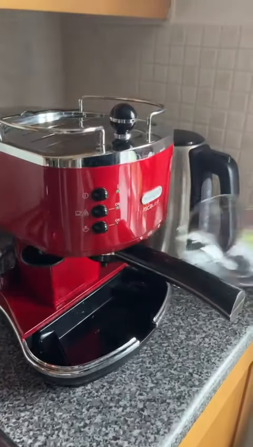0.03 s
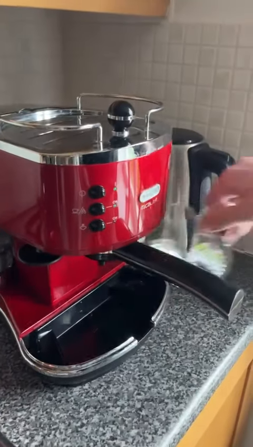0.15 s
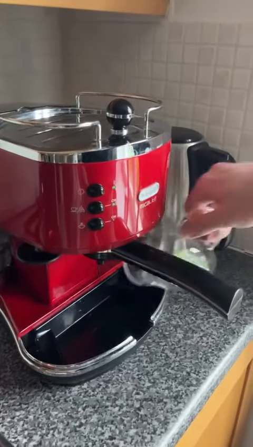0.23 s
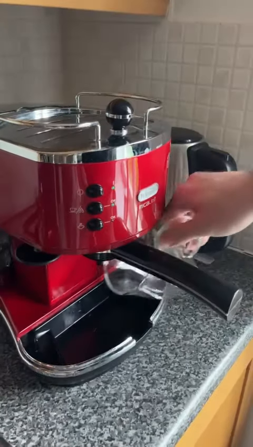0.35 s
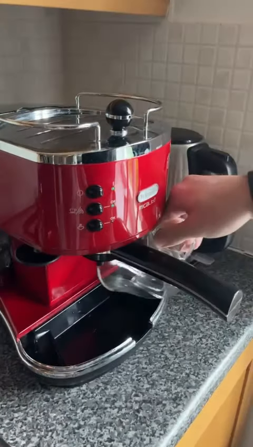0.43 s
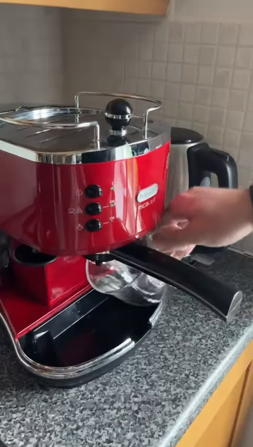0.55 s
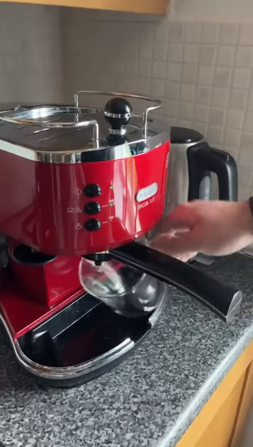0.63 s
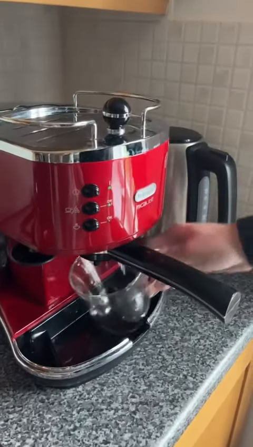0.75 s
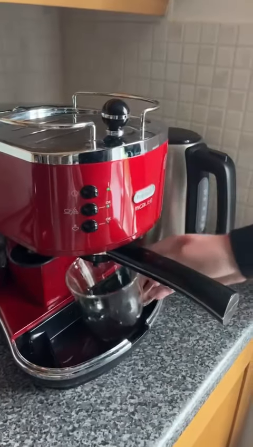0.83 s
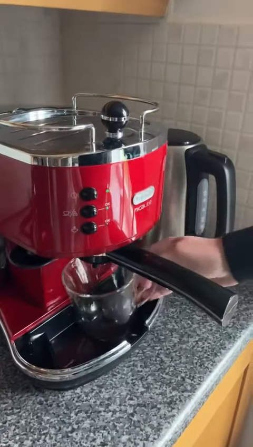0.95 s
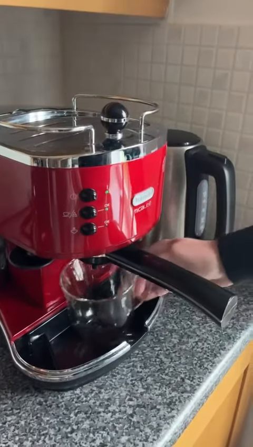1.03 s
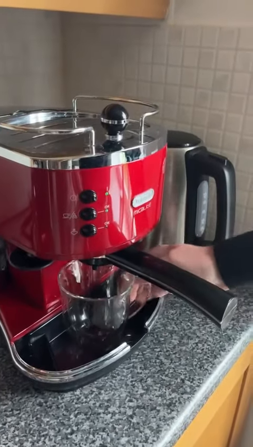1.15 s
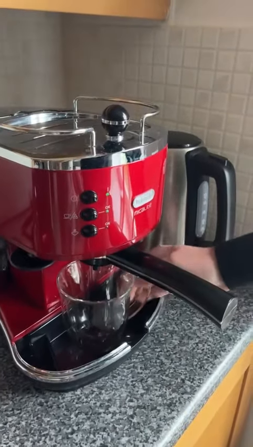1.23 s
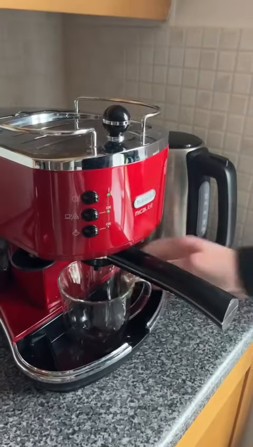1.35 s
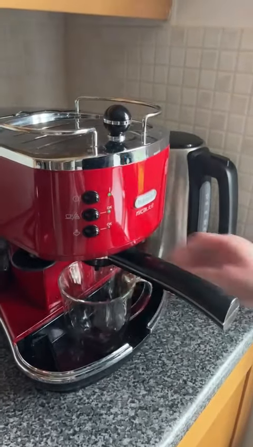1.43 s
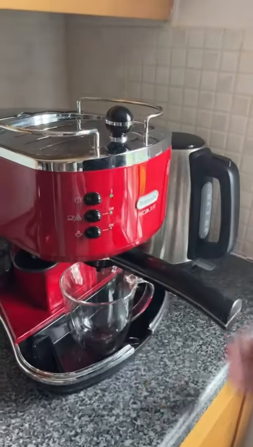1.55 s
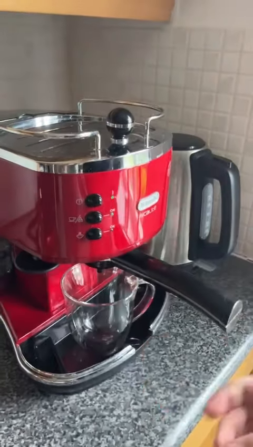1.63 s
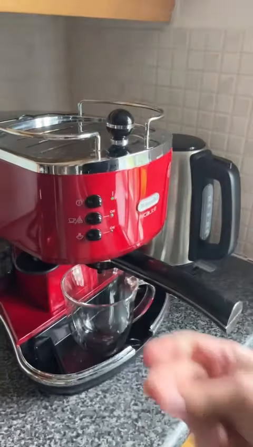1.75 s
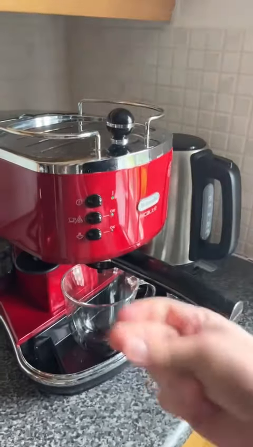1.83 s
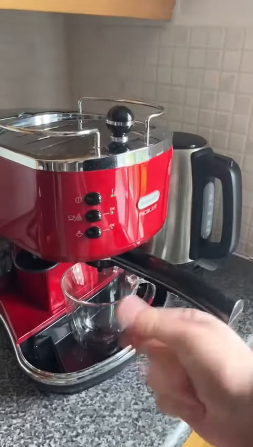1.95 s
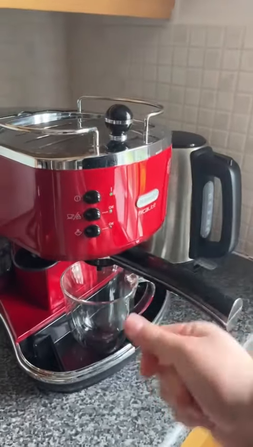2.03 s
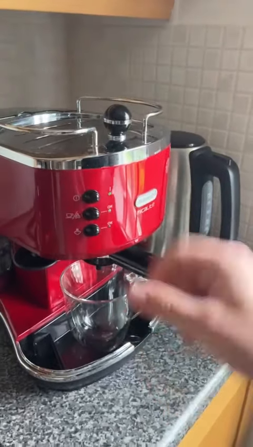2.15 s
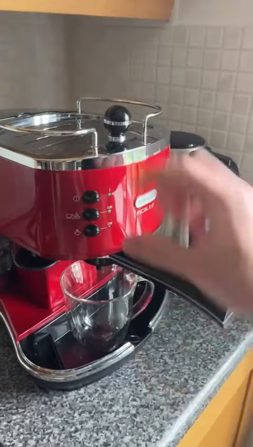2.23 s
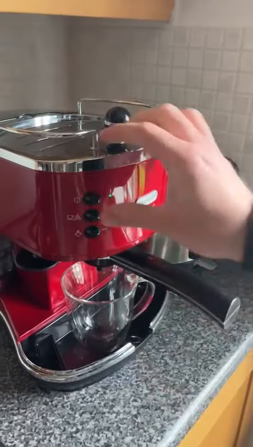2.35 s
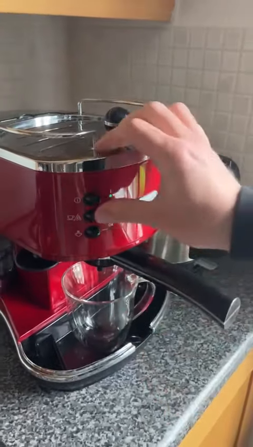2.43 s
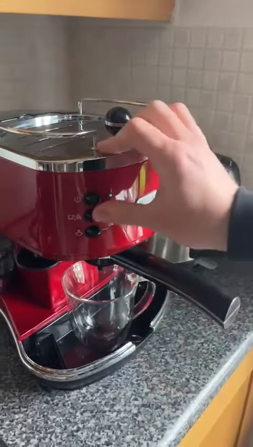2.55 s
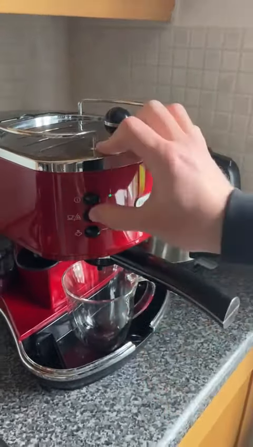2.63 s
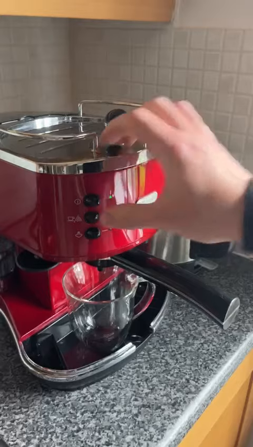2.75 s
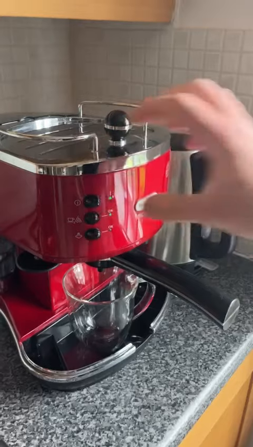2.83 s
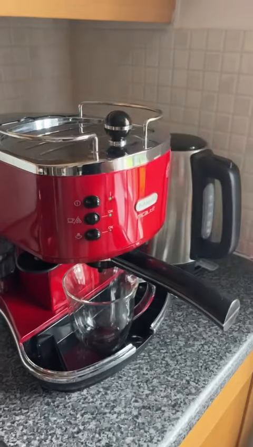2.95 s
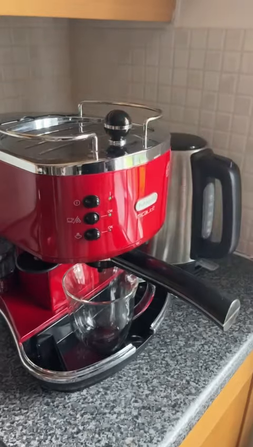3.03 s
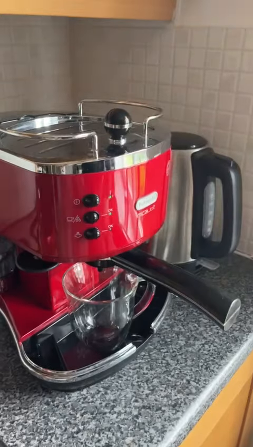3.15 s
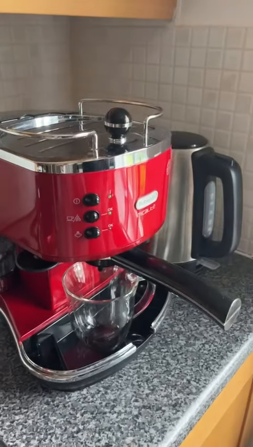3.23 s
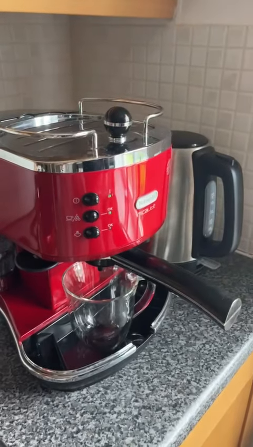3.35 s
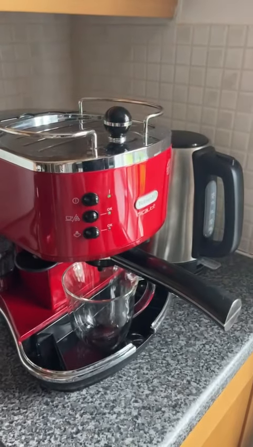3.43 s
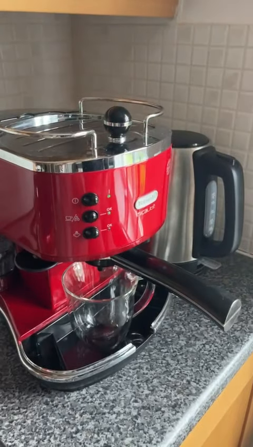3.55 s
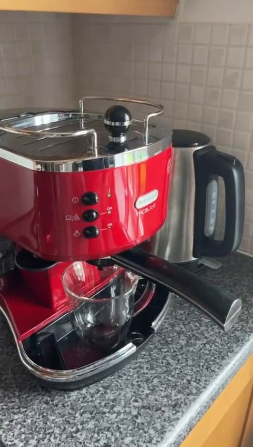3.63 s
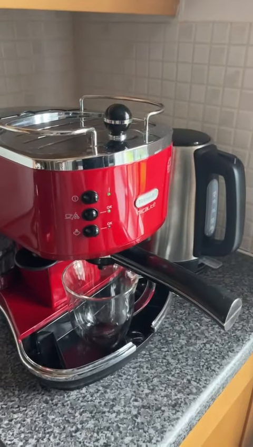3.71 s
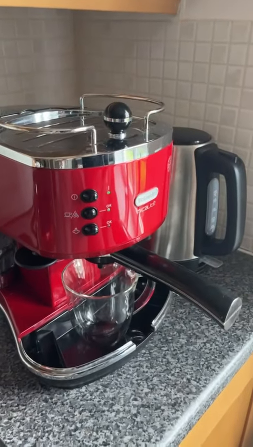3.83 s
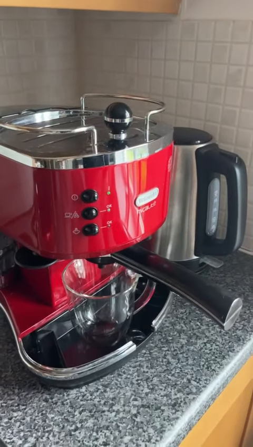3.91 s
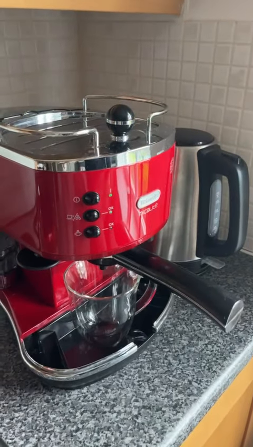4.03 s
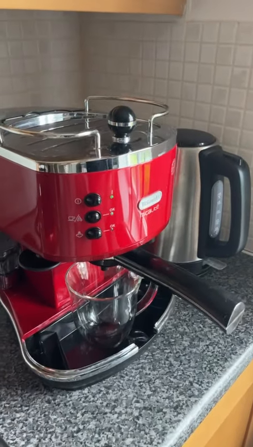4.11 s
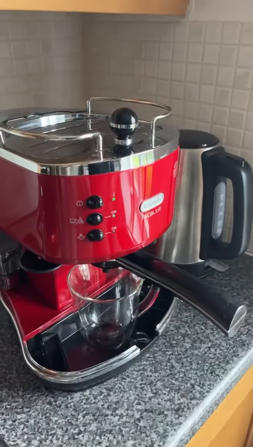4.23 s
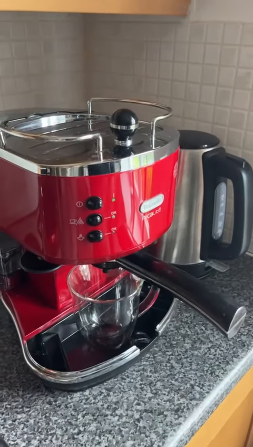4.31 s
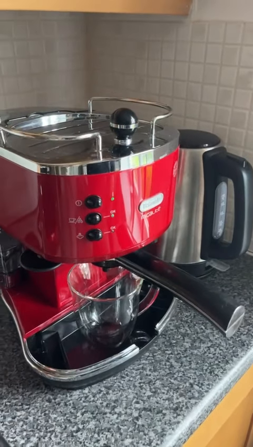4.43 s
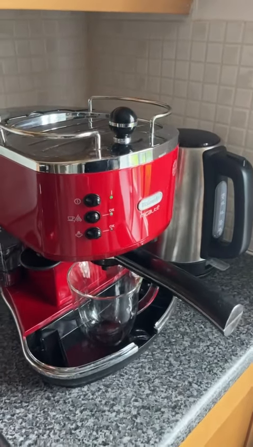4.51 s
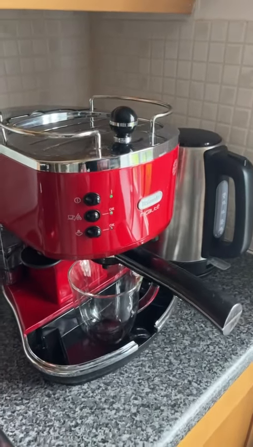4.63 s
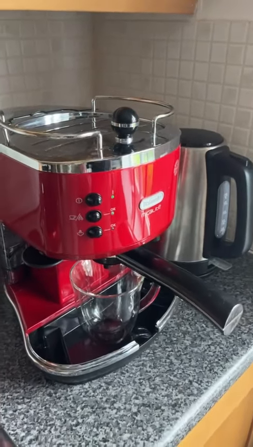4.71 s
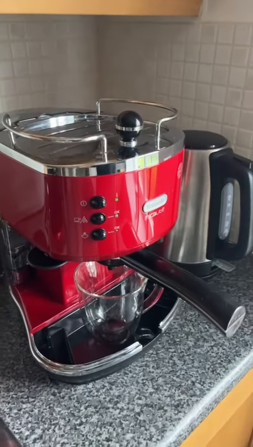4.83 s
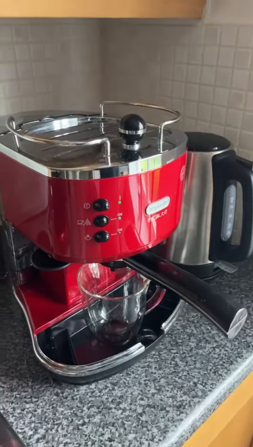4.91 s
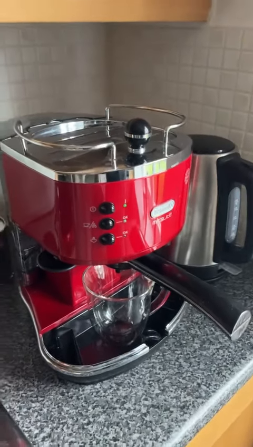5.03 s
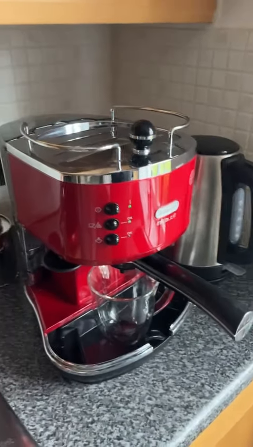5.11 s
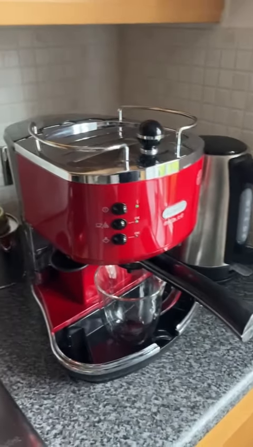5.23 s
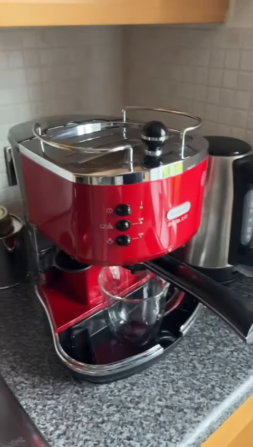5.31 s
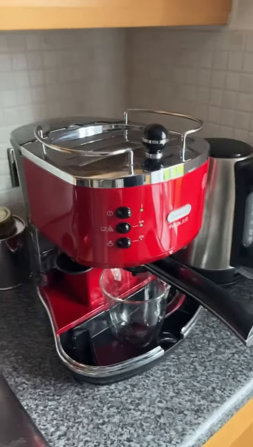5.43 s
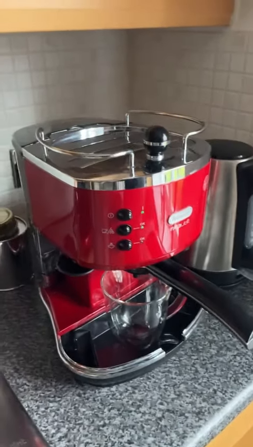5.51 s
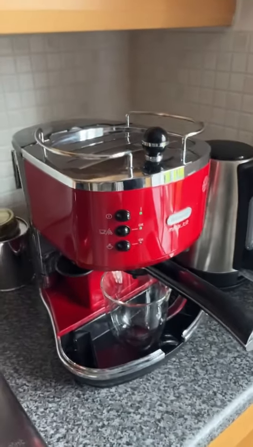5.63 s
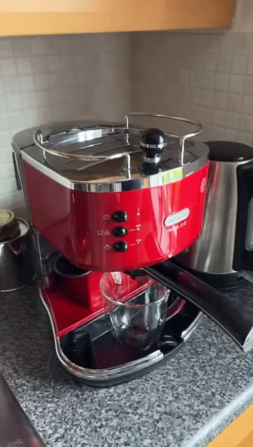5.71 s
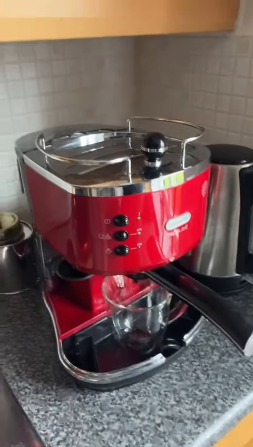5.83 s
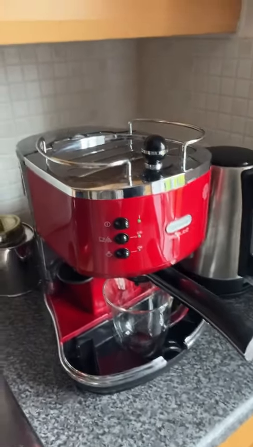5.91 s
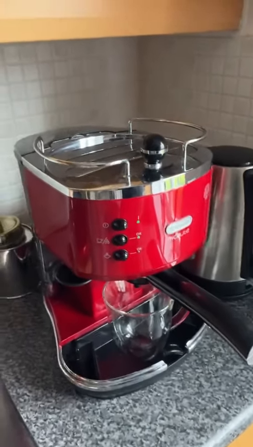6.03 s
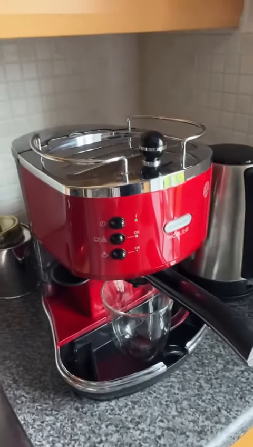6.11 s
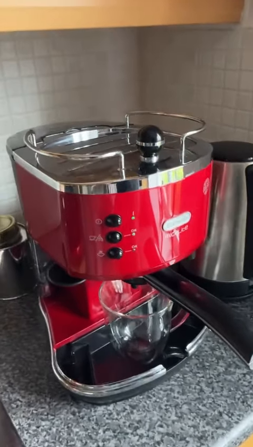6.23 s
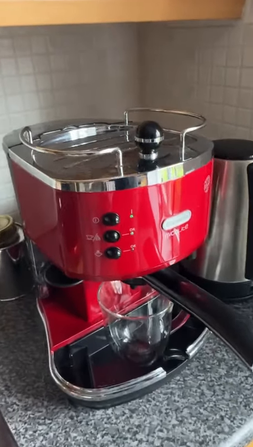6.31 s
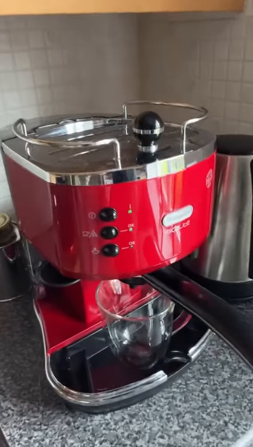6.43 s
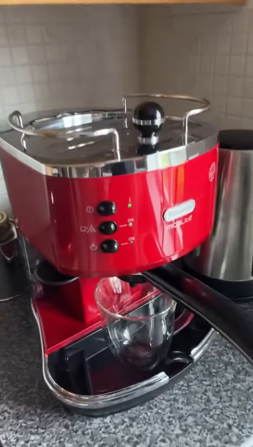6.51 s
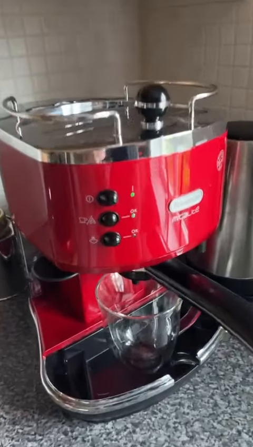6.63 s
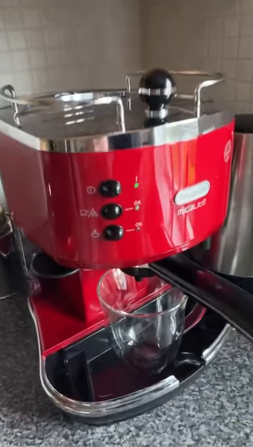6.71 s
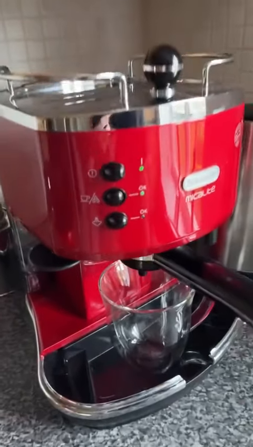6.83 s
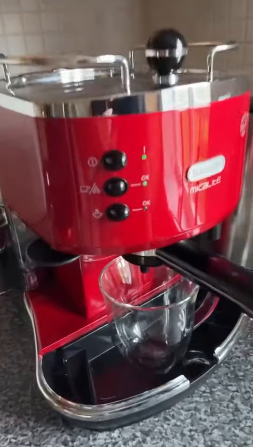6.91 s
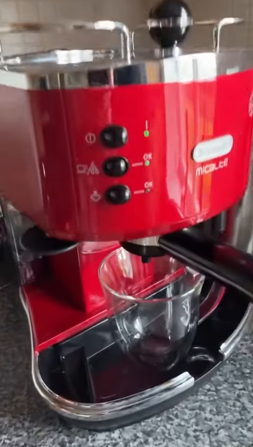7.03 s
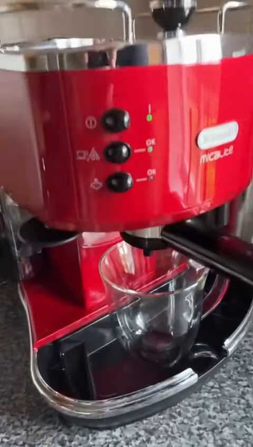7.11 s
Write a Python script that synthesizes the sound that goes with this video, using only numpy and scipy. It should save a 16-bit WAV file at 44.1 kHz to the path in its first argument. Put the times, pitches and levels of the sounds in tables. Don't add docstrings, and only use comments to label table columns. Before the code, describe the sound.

A quiet tiled kitchen with low room rumble, recorded closely in stereo on a hand-held phone. From 0.2 s a glass cup is fitted under a spout: dull hollow tray knocks, a sharp clack at 0.4, a clear glassy ring near 0.64, then a touchdown at 0.84, hard knocks around 0.97 and smaller shifts until 1.24, with soft worktop thumps and sleeve rustle. Near silence follows, broken by a crisp finger snap at 1.97. Faint finger touches at 2.4 lead to a button click at 2.57, and the vibrating pump bursts in immediately: a rough fifty-per-second buzz, low hum, rattling metal shell, bright contact clatter and fine water hiss, with more rattle at first, then steadier. Light ticking strengthens around 4 to 5 s. From 5.3 small grip ticks appear; around 5.8 to 6 the stereo image turns and wobbles, and by 6.5 the hum is nearer, with low air rumble, still running when it ends at about 7.2.

```python
import sys
import numpy as np
from scipy import signal
from scipy.fft import rfft, irfft, next_fast_len
from scipy.io import wavfile
from scipy.ndimage import uniform_filter1d

SR = 44100
rng = np.random.default_rng(int(sys.argv[2]) if len(sys.argv) > 2 else 0)


def generate_wav(sig):
    pcm = np.round(np.clip(np.atleast_2d(sig).T, -1, 1) * 32767).astype(np.int16)
    wavfile.write(sys.argv[1], SR, pcm)


def gain_from_decibels(decibels):
    exponent = np.asarray(decibels, float) / 20
    return 10 ** exponent


N = 315756

MAINS_HZ, FIRST_BLOW_S = 50.03, 2.5717
NEARING_S, NEAR_S = 6.1, 6.48
TURNING_S, TURNED_S = 5.79, 6.0


def rms_one(x):
    return x / np.sqrt(np.mean(x ** 2) + 1e-20)


def in_time(rows):
    s, *columns = np.transpose(rows)
    return [np.interp(np.arange(N) / SR, s, c) for c in columns]


def at_hz(points, hz, count=1):
    return np.interp(np.log(hz), np.log(np.array(points)[:, 0]), np.array(points)[:, count])


def ramp(start_s, end_s):
    return np.clip((np.arange(N) / SR - start_s) / (end_s - start_s), 0, 1)


def swells(rows):
    t = np.arange(N) / SR
    return sum(gain_from_decibels(db - 20 * np.maximum((s - t) / rise, (t - s) / fall)) for s, db, rise, fall in rows)


def drift(rate):
    r = np.exp(-80 * np.pi * rate / SR)
    slow = signal.lfilter([1], [1, -2 * r, r * r], rng.standard_normal(N // 40 + 2002))[2000:]
    return np.interp(np.arange(N) / 40, np.arange(len(slow)), rms_one(slow))


def clicks(s, heights):
    out = np.full(N, 1e-18)
    np.add.at(out, np.round(np.asarray(s) * SR).astype(int), heights)
    return out


def ring(x, hz, t60):
    r, w = gain_from_decibels(-60 / (t60 * SR)), 2 * np.pi * hz / SR
    return signal.lfilter([0, np.sin(w)], [1, -2 * r * np.cos(w), r * r], x)


def fade(x, t60):
    return signal.lfilter([1], [1, -gain_from_decibels(-60 / (t60 * SR))], x)


def filtered(x, order, cut_hz, kind="low"):
    return signal.sosfilt(signal.butter(order, cut_hz, kind, fs=SR, output="sos"), x)


def shaped(x, gain):
    size = next_fast_len(N)
    return irfft(rfft(x, size) * gain(np.arange(size // 2 + 1) * SR / size + 1), size)[..., :N]


def equalized(x, curve):
    return shaped(x, lambda hz: gain_from_decibels(at_hz(curve, hz)))


def coloured(spectrum, channels=1):
    return rms_one(equalized(rng.standard_normal((channels, N)), spectrum))


def patchy(x, low_hz, high_hz, patchy_db):
    edges = low_hz * 2 ** np.arange(0, np.log2(high_hz / low_hz), 1 / 3)
    return rms_one(sum(gain_from_decibels(patchy_db * drift(13.0)) * filtered(x, 2, [low, high], "band")
                       for low, high in zip(edges, edges[1:])))


def struck(modes, hits, scatter_db):
    s, db = np.transpose(hits)
    chance = rng.standard_normal((len(s), len(modes)))
    return sum(ring(clicks(s, gain_from_decibels(db + m[1] + scatter_db * c)), m[0], m[2]) for m, c in zip(modes, chance.T))


def mains_tone(t, k):
    wavering = gain_from_decibels((.5 + .14 * k) * drift(1.5))
    phase = 2 * np.pi * k * MAINS_HZ * t + rng.uniform(0, 2 * np.pi) + .12 * drift(2)
    return np.sqrt(2) * wavering * np.sin(phase)


def coil_hum(t):
    # multiple, level_db, own_change_db_per_s
    multiples = [(1, 0, 0), (2, -23, 0), (3, -6.5, 0), (4, .5, 0), (5, -13, 1), (6, -1.5, 0), (7, -13, -1),
                 (8, -3, -2), (9, -8, 4), (10, -15, -1), (11, -7.5, 0), (12, -15, -2), (13, -13, 0),
                 (14, -10, -2), (15, -11, 1), (16, -19, 0), (17, -16, 0), (18, -18, 0), (19, -25, 0),
                 (20, -19, 0), (21, -12, 3), (22, -21, 0), (23, -17, 2), (24, -17, 0), (25, -12, 4)]
    midway_s, settles_s = 1.7, 1.0
    building = np.clip(t - midway_s, -settles_s, settles_s)
    return rms_one(sum(gain_from_decibels(db + db_per_s * building) * mains_tone(t, k) for k, db, db_per_s in multiples[1:]))


def plunger_strokes(t, near):
    # from_s, pattern_strokes, each_earlier_s
    gaits = [(2.5, 3, .00024), (3.0, 6, .00012), (3.3, 5, -.00013), (3.6, 6, .00011), (3.95, 2, .00019),
             (5.4, 2, .00033), (6.3, 7, -.0001), (6.62, 4, .00018), (6.88, 2, .00035)]
    stroke = np.arange(int(t[-1] * MAINS_HZ))
    beat_s = FIRST_BLOW_S + stroke / MAINS_HZ
    from_s, strokes, step_s = np.transpose(gaits)
    gait = np.searchsorted(from_s, beat_s) - 1
    stray = step_s[gait] * (stroke % strokes[gait] - (strokes[gait] - 1) / 2)
    s = beat_s - stray + .00003 * rng.standard_normal(len(stroke))
    s = s - .0011 * near[(s * SR).astype(int)]
    return stroke, s + .00004 * drift(1.5)[(s * SR).astype(int)]


def contact_rings(blows):
    # after_blow_s, level_db
    contacts = [(-.0012, -6), (0, -4), (.001, -2), (.0035, -1), (.0052, -2), (.0062, -4), (.0078, -4)]
    # time_s, shift_s
    contact_shift = [(2.57, -.0008), (3.3, -.0004), (4.2, -.0002), (5.3, 0), (6.2, -.0003), (7.16, -.001)]
    # pitch_hz, level_db, t60_s
    modes = [(1850, -8.5, 0.011), (2466, -13, 0.0076), (2580, -9.5, 0.0085), (2960, 7.5, 0.01),
             (3090, 0.5, 0.014)]
    touches = np.concatenate([blows[:-1] + row for row in contacts])
    late = np.repeat(np.maximum(np.array(contacts)[:, 0], 0), len(blows) - 1)
    touches[:, 1] -= 698 * late * np.clip(touches[:, 0] - 5.0, 0, 1)
    touches[:, 0] += np.interp(touches[:, 0], *np.transpose(contact_shift))
    tilt_db = late_tilt_db()
    return rms_one(sum(gain_from_decibels(np.sign(m[0] - 2600) * tilt_db) * struck([m], touches, scatter_db=4.0)
                       for m in modes))


def late_tilt_db():
    return 3.5 * ramp(TURNING_S - 0.9, NEARING_S - 0.3)


def valve_hiss(stroke, s, hiss_db):
    # pitch_hz, level_db_per_hz
    hiss_colour = [(4000, -1), (5500, 0.5), (7000, -8.5), (8300, -1), (10000, -4.5), (11000, -11),
                   (11800, -35)]
    # time_s, hiss_db, seat_tick_db
    valve_course = [(2.57, 1.5, -11), (3.2, 1.5, -11), (4.0, 0, 9), (4.9, 4, 0), (5.5, 2, -8),
                    (5.8, -4.5, -17), (6.25, -2.5, -14), (6.5, -1, -17), (7.16, -1, -17)]
    open_s = .009
    force = gain_from_decibels(.8 * rng.standard_normal(len(s)))
    opened = clicks(s - .002, force * open_s * SR)
    spurt = .75 + filtered(uniform_filter1d(opened, int(open_s * SR)), 1, 200)
    flow_db, seat_db = in_time(valve_course)
    snap_db = 5.5 * (stroke % 2) + 3.0 * np.minimum(rng.exponential(1, len(s)), 3)
    seated = clicks(s - .0058, gain_from_decibels(snap_db))
    tick = 0.73 * fade(seated, 0.0074) * coloured(hiss_colour)[0]
    tick = tick + 1.3 * ring(seated, 8540, 0.0049)
    hiss = rms_one(spurt * coloured(hiss_colour)[0])
    return gain_from_decibels(hiss_db + 6 + flow_db) * hiss + gain_from_decibels(-54.5 + seat_db) * tick


def law_db(law, since, near):
    db, start_db, db_per_s, near_db = law
    return db + start_db * np.exp(-since / 0.13) + db_per_s * since + near_db * near


def pump():
    # level_db, start_up_extra_db, change_db_per_s, nearing_change_db
    hum_law = (-31.5, -10, -1.16, 4.5)
    shell_law = (-41, 4, 0.74, 2.5)
    upper_law = (-38.5, 4, -0.5, 0.5)
    hiss_law = (-54.5, 0.5, -0.17, 1)
    # pitch_hz, level_db, t60_s
    shell_modes = [(1175, -12, .06), (1400, -3, .012), (1335, -8, .05), (1378, -3.5, .085), (1428, -4, .08),
                   (1480, -10, .05), (1527, -3.5, .095), (1575, -14, .06)]
    # pitch_hz, level_db, t60_s
    upper_modes = [(2265, 0, .06), (2325, -4, .05), (2480, -10, .05), (2870, -8, .05), (3220, -7, .04),
                   (3560, -10, .03), (3960, -14, .03), (4530, -15, .04)]
    # pitch_hz, level_db_per_hz
    rattle_colour = [(40, -28.5), (65, -3.5), (105, -14.5), (150, -9.5), (235, 0), (350, -6), (720, -2),
                     (830, -2), (1050, -7.5), (1400, 1), (1600, -7.5), (1900, -11), (2500, -62.5)]
    # pitch_hz, level_db_per_hz
    buzz_colour = [(1500, -7.5), (1900, -4.5), (2400, 1), (3600, -1), (5000, -8.5), (6500, -8.5),
                   (8000, -22.5)]
    # pitch_hz, gain_db
    valleys = [(700, -1), (830, -9.5), (950, 0), (1600, -1.5), (1700, -9.5), (1900, 2.5), (2100, -2.5)]
    t = np.arange(N) / SR - FIRST_BLOW_S
    since, near = np.maximum(t, 0), ramp(NEARING_S, NEAR_S)
    hum_db, shell_db, upper_db, hiss_db = (law_db(law, since, near)
                                           for law in (hum_law, shell_law, upper_law, hiss_law))
    running = np.clip((t + 0.011) / 0.014, 0, 1)
    settled = np.clip(t / .22, 0, 1)
    stroke, s = plunger_strokes(t, near)

    blows = np.c_[s, 1.2 * (stroke % 2) + .7 * rng.standard_normal(len(s))]
    shell = rms_one(struck(shell_modes, blows, scatter_db=.8))
    upper = rms_one(struck(upper_modes, blows, scatter_db=1.5))
    force = gain_from_decibels(.8 * rng.standard_normal(len(s)))
    shake = .25 + filtered(fade(clicks(s - .002, force), .07), 1, 200)
    rattle = rms_one((1 + shake) * coloured(rattle_colour)[0])
    buzz = patchy((.2 + shake) * coloured(buzz_colour)[0], 1500, 8500, patchy_db=.8)
    jiggle = shake * rng.standard_normal(N)
    singing = rms_one(sum(gain_from_decibels(db) * ring(jiggle, hz, t60) for hz, db, t60 in shell_modes))

    dry_db = 5 * np.exp(-since / 0.34)
    low = gain_from_decibels(hum_db - 3.77 * settled + 0.9 + dry_db) * rattle
    top = 0.83 * gain_from_decibels(-late_tilt_db()) * upper + 0.49 * contact_rings(blows) + 1.07 * buzz
    high = gain_from_decibels(shell_db + 1.0) * (shell + .3 * singing) + gain_from_decibels(upper_db - 2.5) * top
    hiss = valve_hiss(stroke, s, hiss_db)
    tones, clatter = equalized(np.array([settled * gain_from_decibels(hum_db) * coil_hum(t), low + high]), valleys)
    bass = np.clip(t / 0.06, 0, 1) * gain_from_decibels(-39.3) * mains_tone(t, 1)
    return running * bass, running * tones, running * (clatter + hiss)


def knocks():
    # time_s, peak_db, ring_hz, low_part_db, high_part_db
    cup_knocks = [(0.18, -26, 500, -14.5, -12), (0.185, -18.5, 336, -0.5, -30.5),
                  (0.216, -30.5, 336, 3.5, -25), (0.342, -15.5, 412, 2, -19.5),
                  (0.369, -40, 333, 11, -23.5), (0.391, -4.5, 646, -7, -18), (0.411, -19.5, 624, -4, -47),
                  (0.515, -16.5, 1560, -34.5, -22.5), (0.637, -13, 791, -10, -11),
                  (0.642, -8, 791, -16.5, -25), (0.654, -25, 750, -19, -27), (0.691, -28, 735, 2, -21),
                  (0.836, -11, 660, -14.5, -27), (0.969, -3, 624, -43, -29), (0.994, -8, 592, -21, -35),
                  (1.115, -11, 615, -26, -37), (1.209, -28, 630, -41, -40), (1.236, -22.5, 606, -46, -34)]
    # time_s, peak_db, ring_hz, low_part_db, high_part_db
    finger_touches = [(1.357, -52, 226, 1, -25), (1.632, -67.5, 308, 7.5, -21.5), (1.955, -52, 520, -13, 1),
                      (1.967, -37, 1640, -42, 7.5), (2.415, -42.5, 220, 8.5, -28),
                      (2.432, -42, 202, -16, -34), (2.447, -38.5, 206, -11, -18),
                      (2.513, -41, 203, -15, -26), (2.572, -25, 1450, -6, -17),
                      (2.589, -18, 1420, -33, -13)]
    # pitch_hz, level_db, t60_s
    tray_modes = [(168.8, -6, 0.12), (237, -1, 0.06), (369.4, 1.5, 0.086), (597, 0, 0.18), (624, -13, 0.14),
                  (721, 0.5, 0.12), (763, -1, 0.052), (900, -6, 0.15), (1190, -9.5, 0.037),
                  (1378, -3.5, 0.063), (1560, -15, 0.037), (2160, -3, 0.033), (2530, -15.5, 0.043),
                  (3140, -7.5, 0.062), (3780, -10.5, 0.16), (5340, -17.5, .08)]
    # pitch_hz, level_db_per_hz, t60_s
    crack = [(120, 0.5, 0.092), (250, -10, 0.23), (500, 2.5, 0.078), (980, -6.5, 0.2), (2000, -7.5, 0.076),
             (4000, -2.5, 0.049), (9020, -3, 0.067), (11600, -35, 0.044)]
    ring_db = {"lifted": -2, "rung": 1, "resting": -12.5, "touch": -9.5}
    ring_t60_s = {"lifted": 0.11, "rung": 0.088, "resting": 0.081, "touch": 0.057}
    middle_db = {"lifted": 0.5, "rung": -4.5, "resting": -9.5, "touch": -2.5}
    rung_s, lowered_s = 0.5, 0.8
    s, db, ring_hz, low_db, high_db = np.transpose(cup_knocks + finger_touches)
    kind = ["lifted" if k[0] < rung_s else "rung" if k[0] < lowered_s else "resting" for k in cup_knocks]
    kind += ["touch"] * len(finger_touches)

    def tilted_db(hz):
        curves = [[(300, low + 8), (700, middle_db[k]), (2200, -3.0), (4500, high + 10)]
                  for low, high, k in zip(low_db, high_db, kind)]
        return db + np.array([at_hz(curve, hz) for curve in curves])

    out = np.zeros(N)
    for hz, mode_db, t60 in tray_modes:
        chatter = fade(clicks(s, gain_from_decibels(tilted_db(hz) + mode_db - 35.5)), 0.05) * rng.standard_normal(N)
        out += ring(chatter, hz, t60)
    edges = 90 * 2 ** np.arange(0, 7.1, .5)
    for low, high in zip(edges, edges[1:]):
        hz = np.sqrt(low * high)
        hits = clicks(s, gain_from_decibels(tilted_db(hz) + at_hz(crack, hz) + 1.0))
        dying = fade(hits, at_hz(crack, hz, count=2)) + 0.78 * fade(hits, 0.017)
        dying = dying - 1.2 * fade(hits, 0.0058)
        out += filtered(dying * rng.standard_normal(N), 2, [low, high], "band")
    t = np.arange(SR // 4) / SR
    for k in range(len(s)):
        at = round(s[k] * SR)
        dying_db = 60 * t / ring_t60_s[kind[k]] * ring_hz[k] / 400
        swell = (1 - np.exp(-t / 0.0018)) * gain_from_decibels(db[k] + ring_db[kind[k]] - dying_db)
        out[at:at + len(t)] += swell * np.sin(2 * np.pi * ring_hz[k] * t)
    return filtered(out, 2, 110, "high")


def cup_on_tray():
    # pitch_hz, level_db, t60_s
    hollow_modes = [(346, 1.5, .3), (391, -9, 0.24)]
    # time_s, level_db
    hollow_hits = [
        (.19, -30.5),
        (.35, -28),
        (0.371, -33.5),
    ]
    # pitch_hz, level_db, t60_s
    rim_modes = [(5500, 5, .25), (7700, -6.5, .12)]
    # time_s, level_db
    rim_hits = [
        (.343, -45),
        (.392, -36),
        (.838, -51.5),
        (0.97, -45),
    ]
    # pitch_hz, level_db, t60_s
    resting_modes = [(598, 0, 0.19), (743, -12.5, .12), (899, -1.5, .14), (1306, -4.5, 0.21),
                     (1500, -10.5, .12), (1825, -13.5, 0.17), (2120, -3.5, 0.096), (2681, -12, 0.083),
                     (3040, -1.5, 0.059), (3774, -8, 0.07), (4470, -17, .08)]
    # time_s, level_db
    resting_hits = [
        (.838, -40),
        (.970, -31.5),
        (.996, -36),
        (1.117, -40.5),
        (1.237, -55),
    ]
    out = knocks() + struck(hollow_modes, hollow_hits, scatter_db=1.5)
    out = out + struck(rim_modes, rim_hits, scatter_db=-0.5)
    return out + struck(resting_modes, resting_hits, scatter_db=6)


def glass_ring():
    # pitch_hz, level_db, t60_s
    cup_modes = [(608, -17, .3), (738, -1, .28), (2078, 0, .31), (2939, -15, .14), (3478, -9, .31),
                 (3865, -17, .19), (4247, -13, .13), (4646, -2, .11), (4753, -6, .13), (5173, -22, .1),
                 (7450, -15, .17), (7827, -18, .25), (8393, -21, .25), (9200, -26, .18),
                 (345, -0.5, .14), (904, 4, 0.075), (1170, 5.5, 0.048), (3930, -6, .05),
                  (4430, -17.5, .09), (5050, -13, .09)]
    # time_s, level_db
    glass_hits = [
        (.343, -44),
        (.392, -57.5),
        (.638, -22),
    ]
    free = np.exp(-np.maximum(np.arange(N) / SR - 0.838, 0) / 0.0092)
    return free * struck(cup_modes, glass_hits, scatter_db=1.0)


def finger_snap():
    # pitch_hz, level_db, t60_s
    hand_modes = [(790, -18, 0.02), (1890, -21, 0.02), (2015, -7.5, 0.035), (2176, -11, 0.035),
                  (4870, -5.5, 0.014), (5140, -7, 0.03), (5430, -12, 0.023), (10400, 2.5, 0.0033)]
    # time_s, level_db
    slaps = [
        (1.9674, -15.5),
        (1.9685, -21.5),
    ]
    return filtered(struck(hand_modes, slaps, scatter_db=-3), 1, 900, "high")


def worktop_thump():
    # pitch_hz, level_db, t60_s
    worktop_modes = [(72, -4.5, 1), (162, 1.5, 0.21)]
    # time_s, level_db
    thumps = [
        (0.398, -29.5),
        (0.658, -44),
        (0.849, -37),
        (0.987, -28),
        (1.131, -38.5),
        (1.63, -55),
    ]
    return filtered(struck(worktop_modes, thumps, scatter_db=1), 2, 250)


def ports(x, side, balance):
    def half(hz):
        return 1j * np.arctan(gain_from_decibels(at_hz(side, hz))) + at_hz(balance, hz) * np.log(10) / 40
    return shaped(x, lambda hz: np.exp(np.outer([1, -1], half(hz))))


def pump_at_ports(tones, clatter, turned):
    # pitch_hz, side_over_mid_db
    facing_side = [(60, -30.5), (110, -24.5), (200, -25.5), (400, -6), (700, -7.5), (1100, 4.5),
                   (1700, -18.5), (2300, -7), (2950, 2), (3400, -5.5), (4600, 3.5), (5300, 15.5),
                   (7200, 0.5), (8000, -1.5)]
    # pitch_hz, left_over_right_db
    facing_balance = [(60, -2), (170, -0.5), (500, 1), (1430, -2), (4100, -4), (11800, -0.5)]
    # pitch_hz, side_over_mid_db
    turned_side = [(60, 0), (97, 2), (160, 14.5), (250, 15), (410, 43), (660, 31), (1070, 7.5), (1730, 2),
                   (2790, 12), (4510, 3), (7300, 4), (11800, -4.5)]
    # pitch_hz, left_over_right_db
    turned_balance = [(110, 6), (350, -2), (1130, 7), (2030, -0.5), (6500, 3)]
    facing = np.sqrt(1 - turned) * ports(tones + clatter, facing_side, facing_balance)
    shaken = gain_from_decibels(-3 + 2.5 * drift(10)) * tones + clatter
    return facing + np.sqrt(turned) * ports(shaken, turned_side, turned_balance) * gain_from_decibels(0.5)


def handling():
    # time_s, level_db
    grip_ticks = [(1.884, -46.5), (5.265, -24), (5.331, -32), (5.356, -29), (5.385, -30), (5.41, -31.5),
                  (5.452, -32), (5.5, -35), (5.525, -27.5), (5.575, -31), (5.605, -30), (5.635, -30),
                  (5.69, -31), (5.72, -28.5), (5.756, -27), (5.835, -32), (6.173, -18), (6.42, -21),
                  (6.56, -24)]
    # peak_s, level_db, rise_s, fall_s (over 20 dB)
    gusts = [
        (6.0, -42, 0.1, 2.5),
        (6.55, -47.5, 0.9, 1.2),
        (7.1, -38, 1, 0.5),
    ]
    lump_colour = [(20, -21.5), (45, -0.5), (65, 0.5), (110, -13.5), (190, -2.0), (600, -18.0), (2000, -60.5)]
    tick_colour = [(60, -26), (300, 12.5), (1200, -8.0), (2200, -30.0), (5000, -43), (9000, -54)]
    lumps = coloured(lump_colour, channels=2)
    s, db = np.transpose(grip_ticks)
    tick = fade(clicks(s, gain_from_decibels(db + 18.5)), 0.024) * coloured(tick_colour)[0]
    uneven = gain_from_decibels(4.0 * np.array([drift(6.9), drift(12.0)]))
    breeze = (gain_from_decibels(-78.5) + swells(gusts)) * uneven * (0.5 * lumps + lumps[0] * [[.5], [-1]])
    return breeze + gain_from_decibels(-12.0) * tick * [[1], [-.8]]


def kitchen(x):
    t60_s, wall_cut_hz = 0.37, 8500
    size = next_fast_len(N + SR)
    w = 2 * np.pi * np.arange(size // 2 + 1) / size
    dull = 1 / (1 + 1j * w * SR / (2 * np.pi * wall_cut_hz))
    out = np.zeros((2, len(w)), complex)
    for k, lag in enumerate((rng.uniform(0.0073, .03, 16) * SR).astype(int)):
        loop = gain_from_decibels(-60 * lag / SR / t60_s) * dull * np.exp(-1j * w * lag)
        out[k % 2] += loop / (1 - loop) * (-1) ** (k // 2)
    return irfft(out * rfft(x, size), size)[:, :N]


def air():
    # pitch_hz, level_db_per_hz
    air_colour = [(15, -48), (25, -15), (75, 3.5), (92, -4), (206, -1), (278, -13), (311, -9.5), (357, -15),
                  (540, -16.5), (816, -22), (3310, -58.5), (4350, -42.5), (6000, -82.5), (7800, -105),
                  (13200, -120)]
    # pitch_hz, level_db_per_hz
    rustle_colour = [(500, 11.5), (1500, 1), (4000, -5), (8500, -4), (11500, -10)]
    # pitch_hz, width_hz, level_db
    whistles = [
        (545, 18, -57),
        (4260, 36, -79),
        (101.2, 12, -79),
    ]
    # peak_s, level_db, rise_s, fall_s (over 20 dB)
    stirs = [
        (0.38, -50, 0.189, 0.62),
        (0.97, -57.5, 0.2, 1.6),
    ]
    # peak_s, level_db, rise_s, fall_s (over 20 dB)
    rustles = [
        (0.15, -59, 0.51, 1.6),
        (1.25, -64.5, 0.15, 0.12),
        (1.42, -60, 0.18, 0.18),
        (1.7, -84.5, 0.25, 0.23),
        (2.45, -61, 0.056, 0.092),
        (2.56, -50.5, 0.027, 0.069),
    ]
    both = coloured(air_colour, channels=2)
    pumping = np.arange(N) > FIRST_BLOW_S * SR
    level = gain_from_decibels(-55) + swells(stirs) + gain_from_decibels(-64.5) * pumping
    out = level * gain_from_decibels(0.42 * drift(22.0)) * (both[0] + 0.22 * both[1] * [[1], [-1]])
    for hz, width_hz, db in whistles:
        noise = rng.standard_normal((2, N))
        wide = noise[0] + 2.1 * noise[1] * [[1], [-1]]
        out += gain_from_decibels(db) * rms_one(ring(wide, hz, 3.3 / width_hz))
    flutter_db = 2.0 * drift(15)
    return out + (gain_from_decibels(-86.5) + swells(rustles)) * gain_from_decibels(flutter_db) * coloured(rustle_colour, channels=2)


def scene():
    # pitch_hz, side_over_mid_db
    tray_side = [(60, -15), (120, -20), (220, -22.5), (430, 0), (840, -3), (1630, -6), (3150, -6.5),
                 (6090, 11), (11800, -6.5)]
    # pitch_hz, left_over_right_db
    tray_balance = [(200, -1), (630, 3), (1500, 2.5), (3650, -5.5), (6500, -0.5)]
    # time_s, left_over_right_db
    pan = [(0, 0.6), (4.6, 2.5), (7.16, -3.5)]
    cup, snap = cup_on_tray(), finger_snap()
    bass, tones, clatter = pump()
    turned = np.clip(0.92 * ramp(TURNING_S, TURNED_S), 0, 1)
    room = kitchen(gain_from_decibels(-20.5) * (cup + gain_from_decibels(-1.5) * snap) + gain_from_decibels(-12.5) * clatter)
    whole = ports(cup + snap + glass_ring(), tray_side, tray_balance) + worktop_thump()
    whole = whole + pump_at_ports(tones, clatter, turned) + room + air() + handling()
    bass = bass * gain_from_decibels(turned * (-1.5 + 5 * drift(11)))
    pan_db, = in_time(pan)
    return whole * gain_from_decibels(np.array([pan_db, -pan_db]) / 2) + bass


def sudden(x, open_s):
    moments_s = [4.87, 5.845, 6.005, 6.27, 6.865, 6.91, 6.975, 7.07]
    jump_db, moment_s, moment_share = 13, .022, 0.7
    power = filtered(x, 2, [2500, 5000], "band") ** 2 + 1e-12
    quick, before = uniform_filter1d(power, 128), np.roll(uniform_filter1d(power, 1024), 600)
    hold = int(open_s * SR)
    jumped = 1. * (quick > before * gain_from_decibels(jump_db) ** 2)
    jumps = np.roll(uniform_filter1d(jumped, hold), hold // 2 - 200)
    moments = uniform_filter1d(clicks(moments_s, 64), int(moment_s * SR))

    def opened(marks):
        return np.clip(uniform_filter1d(marks, 256) * 40, 0, 1)
    return np.maximum(opened(jumps), moment_share * opened(moments))


def ragged(x, regions):
    hz, s, cells = signal.stft(x, SR, nperseg=2048)
    for low, high, width, from_s, to_s, rarity in regions:
        rows = np.flatnonzero((hz >= low) & (hz < high))
        strip = ((hz[rows] - low) // width).astype(int)
        chance = rms_one(uniform_filter1d(rng.standard_normal((strip.max() + 1, len(s))), 3))
        cells[rows] *= 1 - (chance[strip] > rarity) * (s >= from_s) * (s < to_s)
    return signal.istft(cells, SR, nperseg=2048)[1][:N]


def top_cut(x):
    return signal.sosfilt(signal.butter(12, 12390, fs=SR, output="sos"), x)


def record(dry):
    # pitch_hz, gain_db
    sum_colour = [(11000, 0), (11500, -22), (12400, -42), (12800, -90)]
    # pitch_hz, gain_db
    difference_colour = [(1650, -4), (1850, -10.5), (2100, 2), (7600, -2.5), (8000, -28), (10200, -31.5),
                         (10600, 4), (11800, 1.5), (12300, -14.5), (12700, -79)]
    # pitch_hz, gain_db
    gap = [(4300, 0), (4900, 3), (5200, 2), (5400, -40), (6800, -40), (6950, -2), (7500, 0)]
    # pitch_hz, gain_db
    gap_foot = [(5100, -60), (5300, -6), (5700, -6), (5850, -60)]
    # low_hz, high_hz, strip_width_hz, from_s, to_s, rarity_of_loss
    sum_strips = [(4950, 5400, 220, 0, 7.2, .2), (4600, 4950, 170, 5.7, 7.2, .6),
                  (6800, 7450, 330, 0, 7.2, -.7), (10400, 11300, 300, 0, 7.2, .5),
                  (2500, 3700, 150, 2.7, 5.9, 1.4), (3700, 4950, 180, 2.7, 5.9, .9),
                  (2450, 3800, 170, 5.9, 6.25, .2), (2450, 3800, 170, 6.25, 7.09, .8),
                  (2600, 3750, 600, 7.09, 7.2, -3), (1640, 1780, 130, 2.7, 7.2, .7),
                  (480, 920, 90, 5.96, 6.03, -1.5), (770, 860, 90, 6.03, 6.2, -.5),
                  (740, 860, 120, 6.4, 6.46, -3), (700, 840, 70, 6.97, 7.1, -.3),
                  (480, 920, 90, 6.05, 6.7, 1.4), (7450, 10400, 250, 2.7, 7.2, 1.2)]
    # low_hz, high_hz, strip_width_hz, from_s, to_s, rarity_of_loss
    difference_strips = [(0, 130, 130, 0, 2.1, -.1), (0, 65, 65, 2.1, 5.2, -3),
                         (65, 130, 65, 2.1, 5.2, -.8), (0, 65, 65, 5.2, 5.96, -3),
                         (65, 130, 65, 5.2, 5.96, .5), (1620, 1950, 170, 2.7, 5.35, -.8),
                         (1560, 2020, 230, 5.35, 5.9, -2.5), (1620, 2050, 130, 5.9, 7.2, .5),
                         (3700, 4800, 130, 2.7, 5.5, 1.2), (3700, 4800, 170, 5.5, 7.2, .4)]
    total = equalized(dry[0] + dry[1], sum_colour)
    gapped = ragged(equalized(total, gap), sum_strips)
    held, all_open = total - gapped, sudden(total, open_s=.008)
    foot = (1 - all_open) * sudden(total, open_s=.045) * equalized(held, gap_foot)
    total = gapped + gain_from_decibels(-5) * all_open * held + foot
    difference = ragged(equalized(dry[0] - dry[1], difference_colour), difference_strips)
    return top_cut(np.array([total + difference, total - difference]) / 2)


dry = scene()
out = record(dry)
generate_wav(out)
```